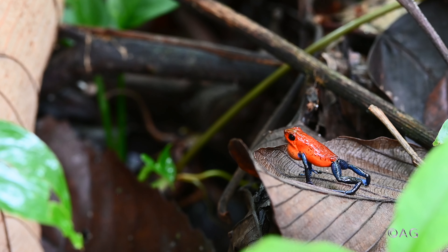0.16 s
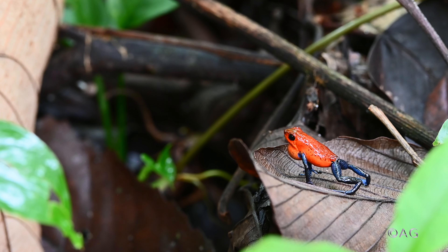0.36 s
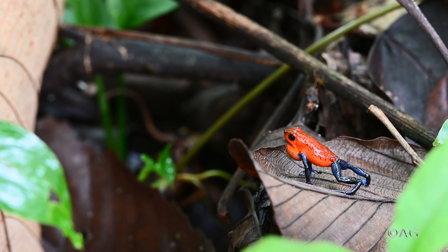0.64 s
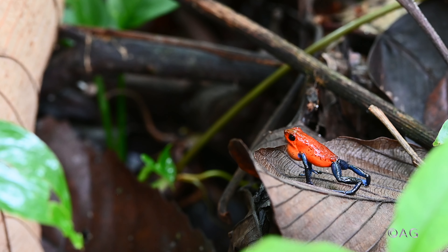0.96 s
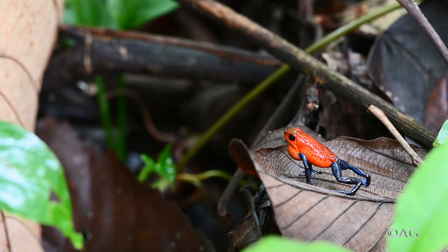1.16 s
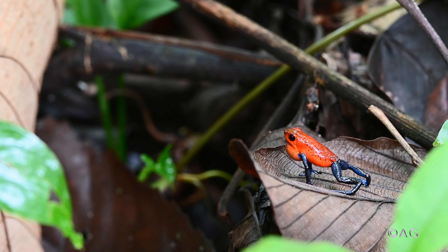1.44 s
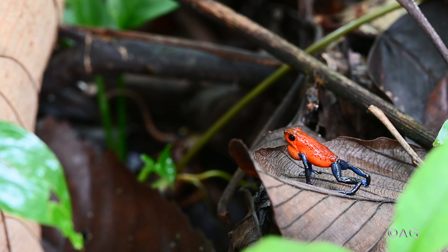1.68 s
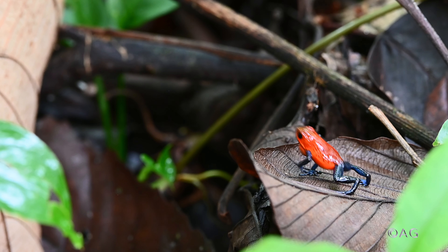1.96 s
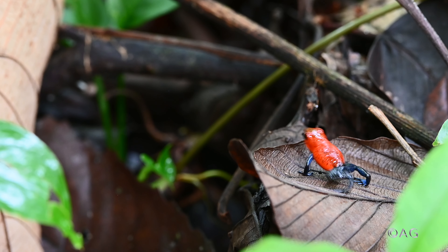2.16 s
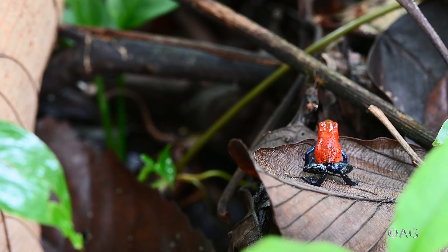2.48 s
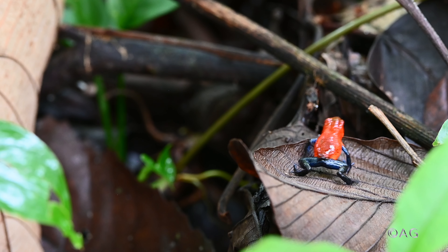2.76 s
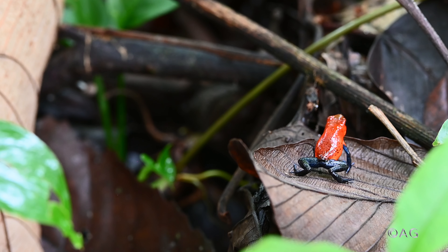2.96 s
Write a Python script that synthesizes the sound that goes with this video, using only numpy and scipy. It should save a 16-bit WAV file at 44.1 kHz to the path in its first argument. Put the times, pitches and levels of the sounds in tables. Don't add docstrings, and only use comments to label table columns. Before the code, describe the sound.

Small frogs give rapid, buzzy pulsed calls over a quiet forest floor with faint leaf wash

```python
import sys
import numpy as np
from scipy import signal
from scipy.fft import rfft, irfft
from scipy.io import wavfile
from scipy.ndimage import uniform_filter1d

SR = 44100
rng = np.random.default_rng(int(sys.argv[2]) if len(sys.argv) > 2 else 0)


def undo_db(level):
    steps = np.asarray(level, float) / 20
    return 10 ** steps


def generate_wav(signal):
    frames = np.transpose(np.atleast_2d(signal))
    scaled = np.clip(frames, -1, 1) * 32767
    pcm = np.round(scaled).astype(np.int16)
    wavfile.write(sys.argv[1], SR, pcm)


N = 137592


def evened(x):
    return x / np.sqrt(np.mean(x ** 2) + 1e-20)


def read(points, hz):
    f, value = np.transpose(points)
    return np.interp(np.log(hz + 1), np.log(f + 1), value)


def resonate(x, hz, width_hz):
    turn = np.exp(2j * np.pi * hz * np.arange(x.shape[-1]) / SR)
    r = np.exp(-np.pi * width_hz / SR)
    return 2 * (turn * signal.lfilter([(1 - r) ** 2], [1, -2 * r, r * r], x / turn)).real


def add_click(mix, s, db):
    at = int(s * SR) + np.arange(-8, 9)
    inside = (at >= 0) & (at < len(mix))
    click = np.sinc(at - s * SR) * np.hanning(19)[1:-1]
    mix[at[inside]] += undo_db(db) * click[inside]


def forest(x, t60_s):
    t = np.arange(SR // 2) / SR
    fade = undo_db(-60 * t / t60_s) * np.minimum(t / .008, 1)
    tail = rfft(rng.standard_normal((2, len(t))) * fade)
    tail = irfft(tail / np.sqrt(uniform_filter1d(abs(tail) ** 2, size=150)))
    return signal.fftconvolve(x[None], tail, axes=1)[:, :len(x)]


def click_gaps(base_s, extra_s, kept, squeeze_s):
    k = np.arange(30)
    return np.maximum(base_s + extra_s * kept ** k - squeeze_s * k, .0029)


def click_trains(calls, levels_db, gaps, swell, sac, lead, shy_starts_s):
    first_db, rise_share, last_db = swell
    modes = np.zeros((len(sac), N + lead))
    luck = rng.standard_normal((len(calls), 2, 30))
    for (start, length, tempo), db, (late, uneven) in zip(calls, levels_db, luck):
        jitter_s = .0002 * late * (np.arange(30) > 0)
        t = tempo * (np.cumsum(gap := gaps) - gap) + jitter_s
        for s, uneven_by in zip(t[t <= length], uneven):
            done = s / length
            level_db = db + np.interp(done, [0, rise_share, 1], [first_db, 0, last_db]) + 1.6 * uneven_by
            if s == 0 and start in shy_starts_s:
                level_db -= 12
            for row, mode in zip(modes, sac):
                add_click(row, start - .0006 + s + lead / SR, level_db + mode[3] * (done - .5))
    return modes


def frog(calls, levels_db, gaps, swell, sac, echoes, pan_db, left_lag_s, wet_db, t60_s, shy_starts_s=()):
    lead = SR // 10
    modes = click_trains(calls, levels_db, gaps, swell, sac, lead, shy_starts_s)
    rings = np.zeros_like(modes)
    for n, (hz, width_hz, db, _, _) in enumerate(sac):
        sign = (-1) ** n
        rings[n] = sign * undo_db(db + 36.5) * resonate(modes[n], hz, width_hz) * 500 / width_hz
    scattered = undo_db(np.array(sac)[:, 4]) @ rings

    ears = np.zeros((2, 400))
    add_click(ears[0], 10 / SR + left_lag_s, pan_db / 2)
    add_click(ears[1], 10 / SR, -pan_db / 2)
    for s, left_db, right_db in echoes:
        add_click(ears[0], s * 1.04, left_db)
        add_click(ears[1], s * .96, right_db)
    direct = signal.oaconvolve(rings.sum(0)[None], ears, axes=1)[:, 10:N + lead + 10]
    wet = undo_db(wet_db)
    out = direct + wet * forest(scattered, t60_s)
    return out[:, lead:] / np.sqrt(1 + wet ** 2)


# (start [s], length [s], gap stretch [ratio])
NEAR_CALLS = [(-.0555, .066, 1.0), (.0990, .064, .95), (.2567, .067, .97), (.4195, .067, .95),
              (.5815, .063, .97), (.7420, .067, .97), (.9021, .065, .97), (1.0575, .065, .95),
              (1.2165, .071, 1.02), (1.3810, .065, 1.03), (1.5357, .064, .98), (1.6867, .069, .99)]
NEAR_CALL_DB = [-41.5, -36, -35.5, -36, -36, -36.5, -37, -36.5, -37, -36.5, -36.5, -36.5]
# (pitch [Hz], width [Hz], level [dB], growth over call [dB], extra scatter [dB])
NEAR_SAC_MODES = [(2968, 560, 0, -9, 2), (3430, 460, 1, -1.5, -2.5), (4050, 350, 4, 2, 4),
                  (4870, 540, 2, -11.5, -4), (5450, 890, -5.5, 7, -2.5), (6600, 1180, -5.5, -11, -1.5),
                  (7210, 350, -12.5, -6, -3.5), (8600, 4400, -11, -19, 10.4), (10520, 750, -17.5, 7, 4)]
# (delay [s], left [dB], right [dB])
NEAR_LEAVES = [(.0012, -12, -10), (.0021, -11, -14), (.0052, -13, -11)]


def near_frog():
    gaps = click_gaps(base_s=.0047, extra_s=.0001, kept=.5, squeeze_s=.000105)
    swell = (-14, .55, -2)
    return frog(NEAR_CALLS, NEAR_CALL_DB, gaps, swell, NEAR_SAC_MODES, NEAR_LEAVES,
                pan_db=.6, left_lag_s=-.00004, wet_db=-2.5, t60_s=.14)


def rival_gaps():
    return click_gaps(base_s=.0050, extra_s=.0042, kept=.48, squeeze_s=.00013)


# (start [s], length [s], gap stretch [ratio])
RIVAL_CALLS = [(.5780, .060, 1.1), (.7275, .061, 1.05), (.8790, .061, 1.04), (1.0229, .061, 1.03),
               (1.1720, .065, 1.05), (1.3244, .056, 1.03), (1.4680, .061, .99), (1.6187, .060, .99),
               (1.7711, .060, 1.04), (1.9201, .061, 1.06), (2.0657, .061, .98), (2.2168, .060, 1.04),
               (2.3691, .060, .98), (2.5196, .058, .945), (2.6698, .060, .99), (2.8201, .059, 1.03),
               (2.9728, .058, .98), (3.1170, .058, 1.0)]
RIVAL_CALL_DB = [-45, -40, -42, -37.5, -38.5, -39.5, -39, -38.5, -40, -39.5, -39, -39.5, -39, -38, -40,
                 -38.5, -39, -37.5]
# (pitch [Hz], width [Hz], level [dB], growth over call [dB], extra scatter [dB])
RIVAL_SAC_MODES = [(3180, 650, -6.5, 2.1, -0.088), (3817, 790, 3, .1, -0.37), (4377, 495, 7, 0.5, 1),
                   (5000, 1040, -6, 3.3, 0.23), (6430, 3300, -1, .1, -0.73)]
# (delay [s], left [dB], right [dB])
RIVAL_LEAVES = [(.0011, -15, -11), (.0036, -9, -12), (.0062, -18, -15)]


def rival_frog():
    swell = (-4.5, .55, -3.5)
    return frog(RIVAL_CALLS, RIVAL_CALL_DB, rival_gaps(), swell, RIVAL_SAC_MODES, RIVAL_LEAVES,
                pan_db=1.3, left_lag_s=-.00003, wet_db=-5, t60_s=.15,
                shy_starts_s=(.7275, 1.1720, 1.4680))


# (start [s], length [s], gap stretch [ratio])
FAR_CALLS = [
    (.02, 0.14, 1.0),
    (.17, 0.068, 0.91),
    (.335, 0.044, 1.0),
    (.495, 0.028, 0.86),
    (.655, 0.04, 0.98),
    (.825, 0.05, 1.0),
    (.99, .05, 0.87),
]
FAR_CALL_DB = [-48, -56, -48, -37, -34, -34.5, -37]
# (pitch [Hz], width [Hz], level [dB], growth over call [dB], extra scatter [dB])
FAR_SAC_MODES = [(4120, 510, 4, .1, .1), (3600, 500, -11, .1, .1)]


def far_frog():
    return frog(FAR_CALLS, FAR_CALL_DB, rival_gaps(), (-4.5, .55, -3.5), FAR_SAC_MODES, [],
                pan_db=.1, left_lag_s=.0001, wet_db=14, t60_s=.15)


# (start [s], length [s], level [dB])
CRICKET_CHIRPS = [
    (0.594, 0.022, -49),
    (0.65, 0.027, -59),
    (.69, 0.025, -57),
    (2.385, 0.024, -46),
    (2.426, .032, -55),
    (2.476, 0.029, -55),
]


def cricket():
    pitch_hz, octave_db, throb_hz = 7190, -13, 184
    t, swell = np.arange(N) / SR, np.zeros(N)
    for s, length, db in CRICKET_CHIRPS:
        done = np.clip((t - s) / length, 0, 1)
        throb = 0.36 + 0.13 * np.cos(2 * np.pi * throb_hz * (t - s))
        swell += undo_db(db + 11) * np.sin(np.pi * done) ** 2 * throb
    wobble = 1.6 * evened(uniform_filter1d(rng.standard_normal(N), 200))
    turn = 2 * np.pi * pitch_hz * t + wobble
    chirps = swell * (np.sin(turn) + undo_db(octave_db) * np.sin(2 * turn))
    return chirps * undo_db([[2.5], [-3.5]]) + undo_db(-1.0) * forest(chirps, 0.26)


def twitter():
    start_s, length_s, level_db = 1.812, 0.15, -52.5
    top_hz, low_hz = 8900, 5370
    out, u = np.zeros(N), np.linspace(0, 1, 500)
    for when, drop, softness in rng.random((220, 3)):
        spread = min(0.69 + 6.7 * when, 1)
        hz = (top_hz - (top_hz - low_hz) * drop * spread) * (1 - 0.078 * u)
        note = np.sin(np.pi * u) * np.sin(2 * np.pi * np.cumsum(hz) / SR)
        at = int((start_s + length_s * when) * SR)
        out[at:at + 500] += undo_db(-6.0 * softness - 3.1 * when) * note
    return undo_db(level_db) * (0.51 * out + forest(out, 0.2))


# (pitch [Hz], likeness [0 to 1])
EAR_LIKENESS = [(60, 0.84), (150, 0.9), (500, .65), (1200, 0.71), (3000, 0.067), (8000, 0.11),
                (15000, 0.038)]
# (pitch [Hz], width [Hz], start level [dB], end level [dB], left over right [dB])
DRONE_TONES = [
    (58, 30, -55.5, -59.5, -1),
    (72, 23, -52.5, -55, 1.3),
    (301.6, 8.6, -66.5, -55, 0),
    (906, 78, -61, -64, 9),
    (1093, 8.6, -67, -67, -6),
    (4260, 700, -50.5, -50.5, -1),
    (7800, 74, -82, -71, 18),
]


def drone():
    out = np.zeros((2, N))
    for hz, width_hz, start_db, end_db, pan_db in DRONE_TONES:
        left, other = rng.standard_normal((2, N))
        same = np.clip(read(EAR_LIKENESS, hz) + 0.3, 0, 1)
        right = same * left + np.sqrt(1 - same ** 2) * other
        tone = signal.hilbert(resonate(np.array([left, right]), hz, width_hz))
        if width_hz < 100:
            tone = tone / abs(tone) ** .5
        level_db = np.linspace(start_db, end_db, N) + np.array([[pan_db / 2], [-pan_db / 2]])
        out += evened(tone.real) * undo_db(level_db)
    return out


# (pitch [Hz], level per Hz [dB])
WASH_COLOUR = [(71, -25), (120, -6.5), (307, -6.5), (816, -8), (902, -7.5), (2260, -12.5), (2930, -12),
               (4280, -12.5), (14200, -30)]


def wash():
    frames, hz = N // 256 + 5, np.fft.rfftfreq(1024, 1 / SR)
    a, b, c, d, patches = rng.standard_normal((frames, 513, 5)).T
    patches = evened(uniform_filter1d(uniform_filter1d(patches, 12, 0), 14, 1))
    same = np.clip(read(EAR_LIKENESS, hz), -1, 1)[:, None]
    left = a + 1j * b
    right = same * left + np.sqrt(1 - same ** 2) * (c + 1j * d)
    treble_cut_db = 33.0 * np.clip((hz - 14300) / 500, 0, 1)
    colour_db = (read(WASH_COLOUR, hz) - treble_cut_db)[:, None] + 0.56 * patches
    z = np.array([left, right]) * undo_db(colour_db) * (hz > 30)[:, None]
    return undo_db(-45.5) * evened(signal.istft(z, nperseg=1024, noverlap=768)[1][:, :N])


def whine():
    turn = 2 * np.pi * 15709.5 * np.arange(N) / SR
    return np.array([undo_db(-52) * np.sin(turn), undo_db(-61) * np.sin(turn + 2.5)])


def scene():
    frogs = near_frog() + rival_frog() + far_frog()
    return frogs + cricket() + twitter() + drone() + wash()


def top_cut(x):
    return signal.sosfilt(signal.butter(12, 15950, fs=SR, output="sos"), x)


def record(dry):
    mix = dry + whine()
    return top_cut(mix)


dry = scene()
out = record(dry)
generate_wav(out)
```